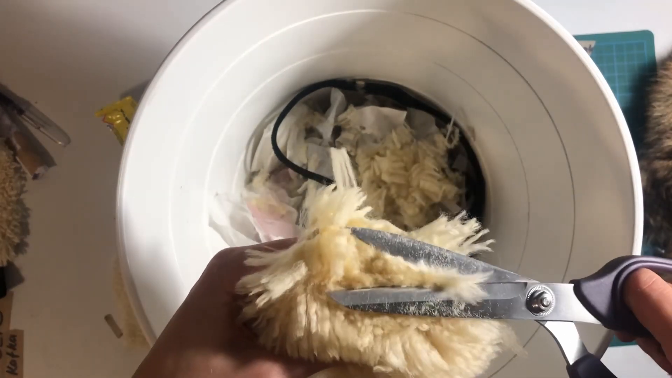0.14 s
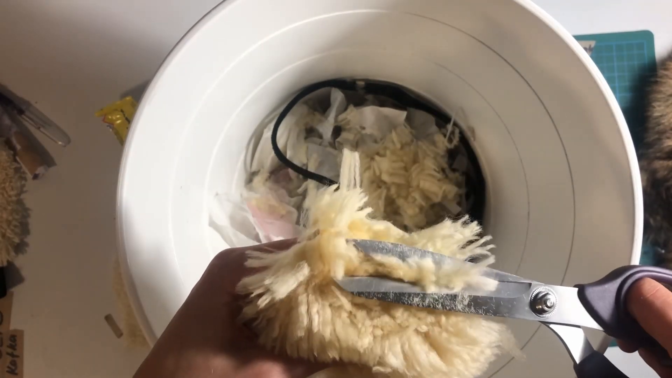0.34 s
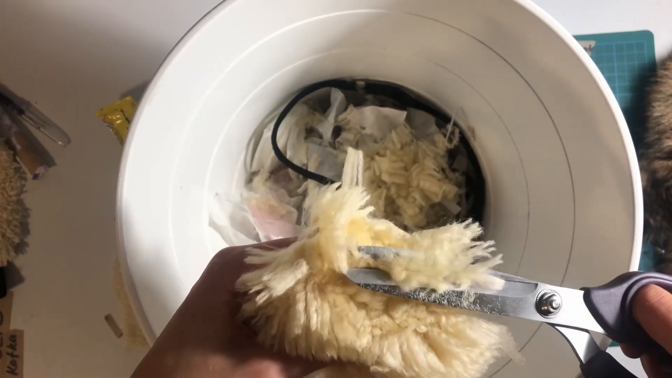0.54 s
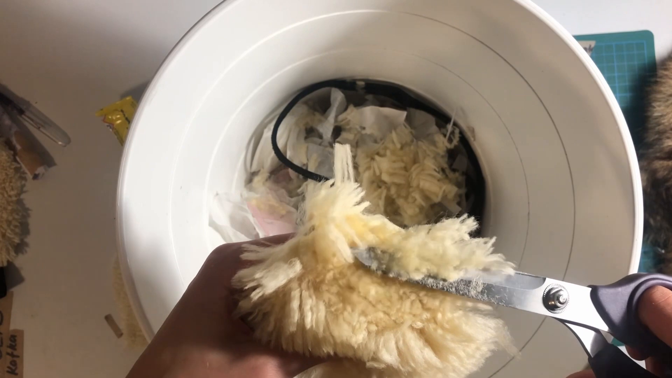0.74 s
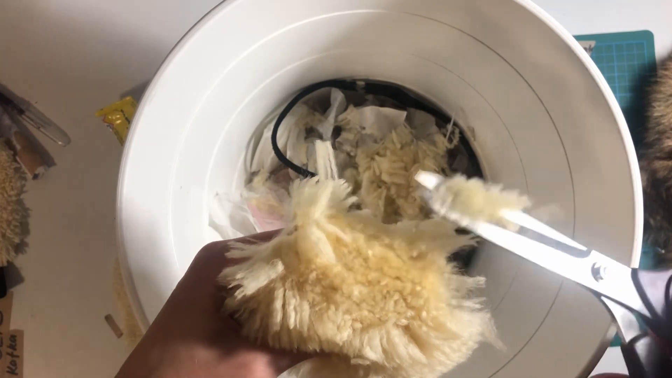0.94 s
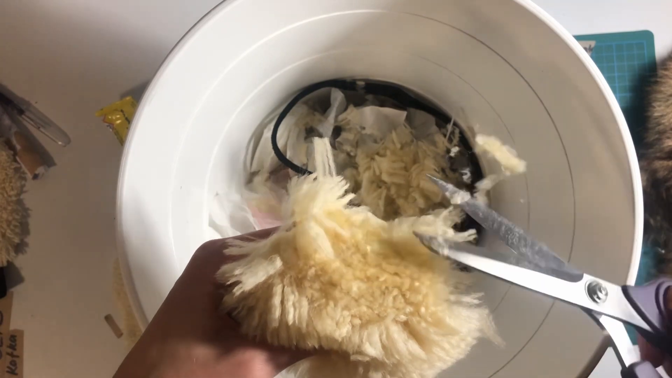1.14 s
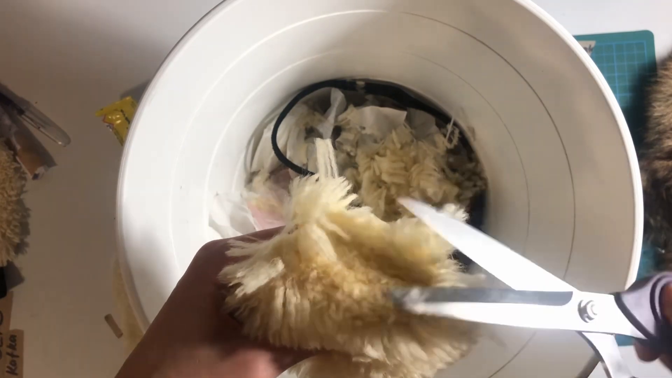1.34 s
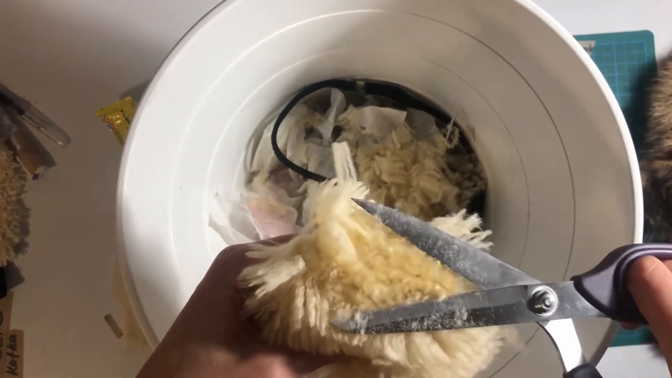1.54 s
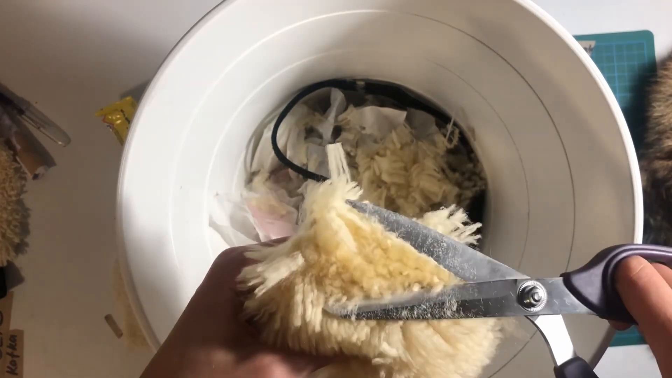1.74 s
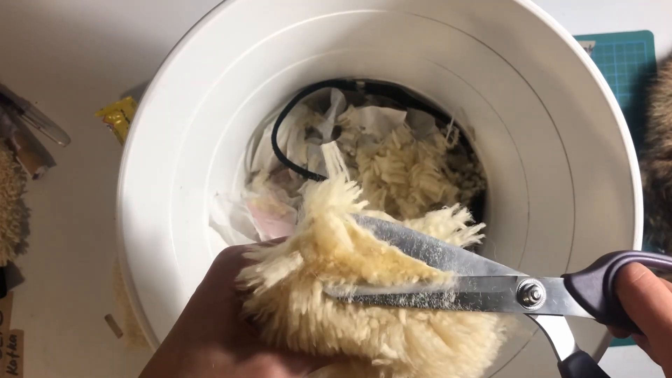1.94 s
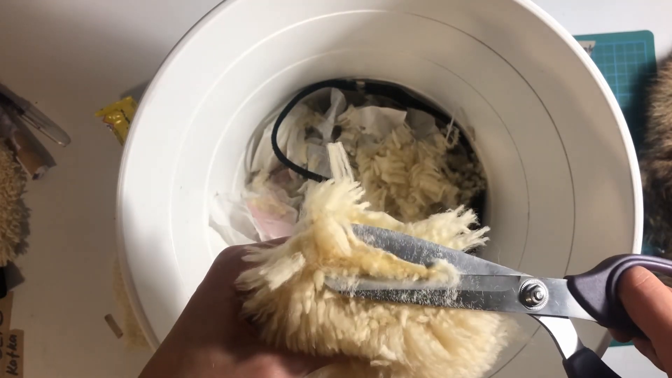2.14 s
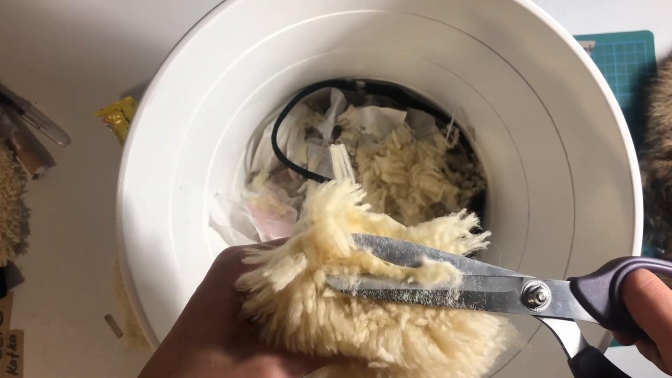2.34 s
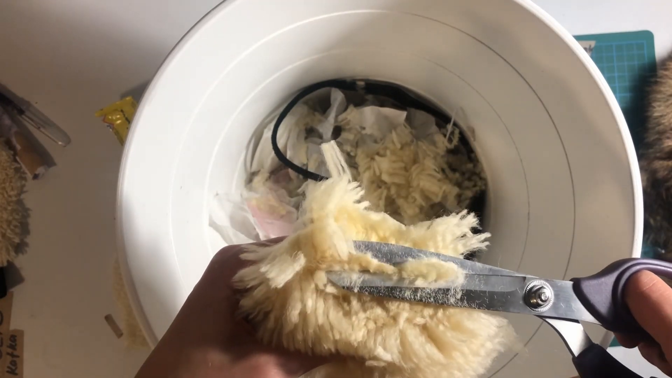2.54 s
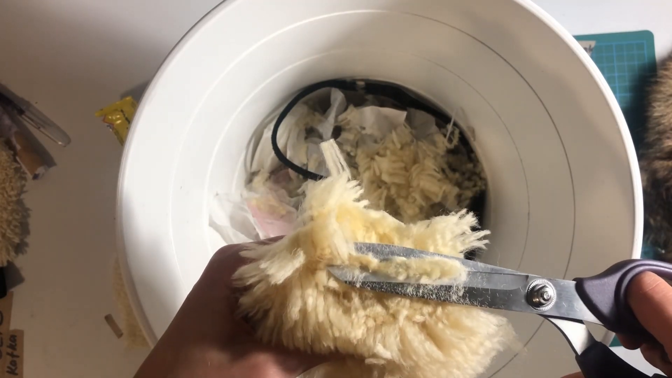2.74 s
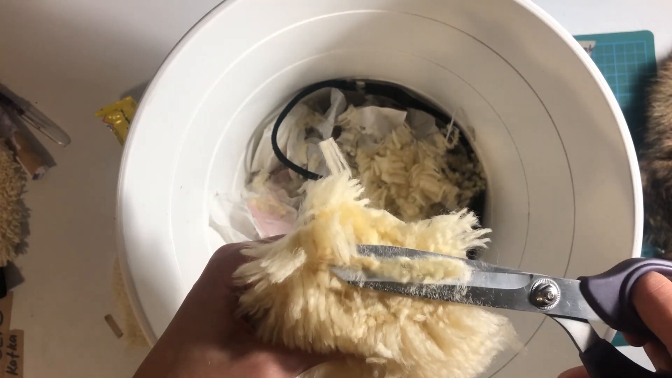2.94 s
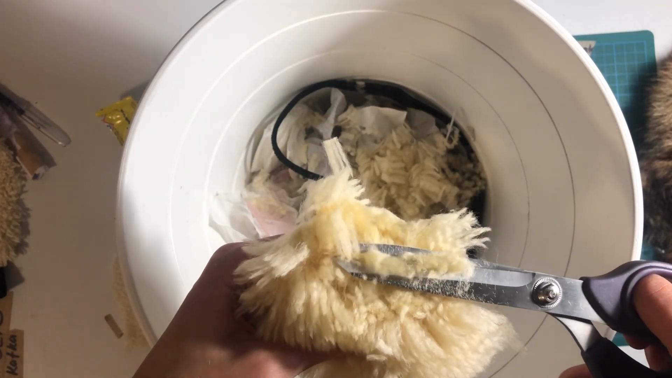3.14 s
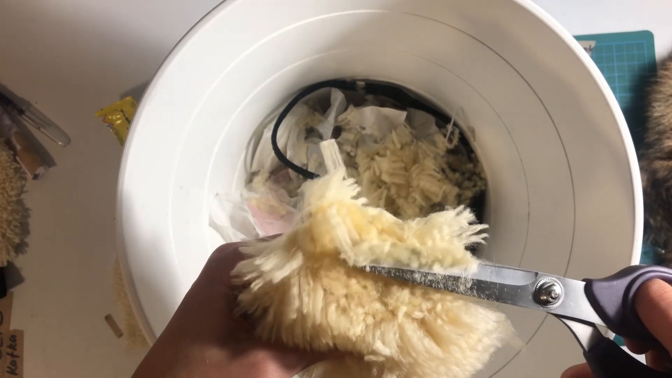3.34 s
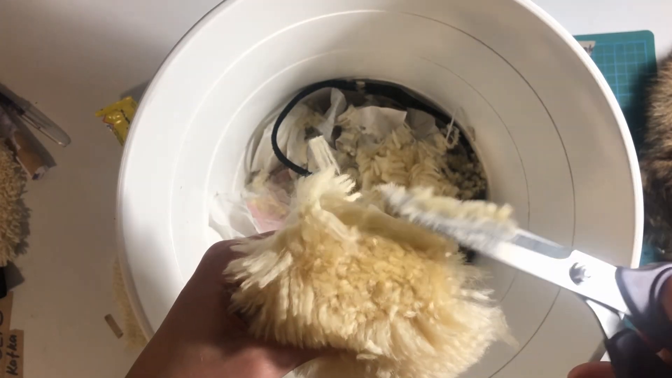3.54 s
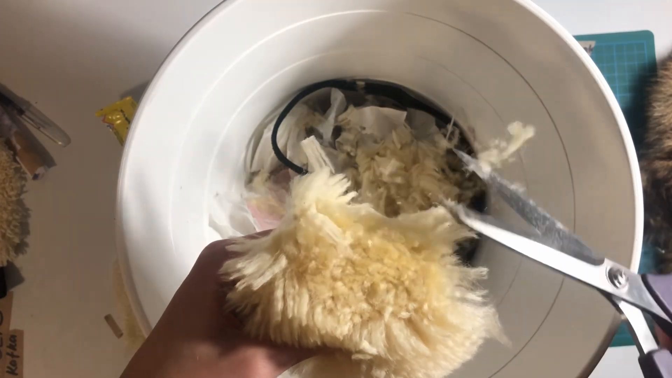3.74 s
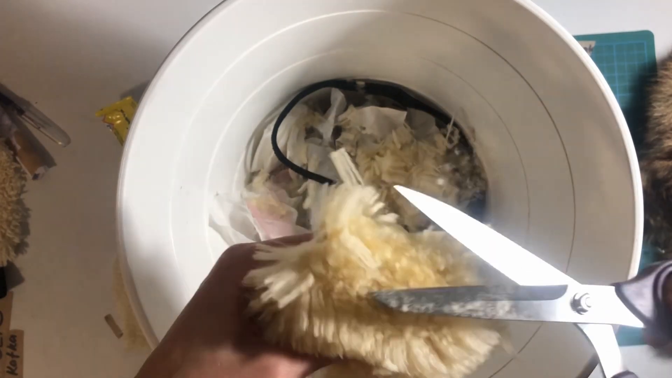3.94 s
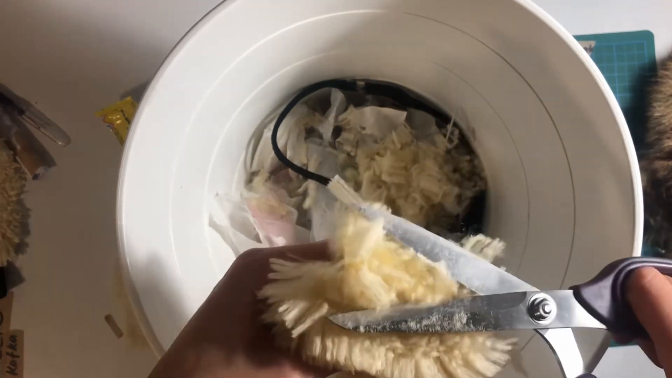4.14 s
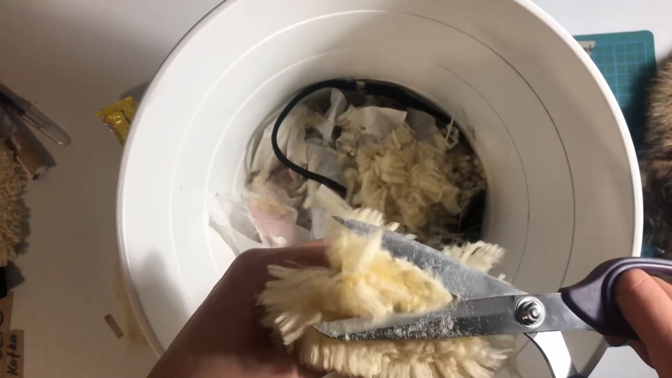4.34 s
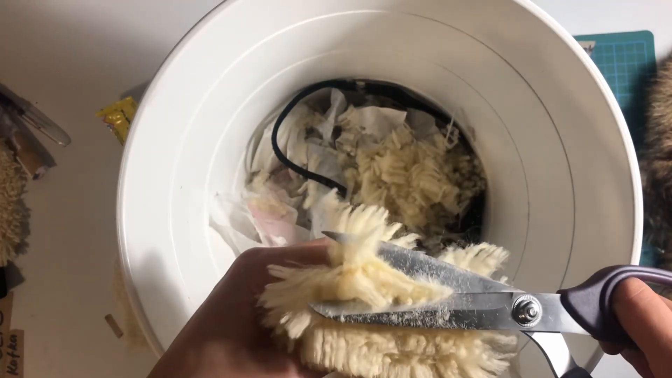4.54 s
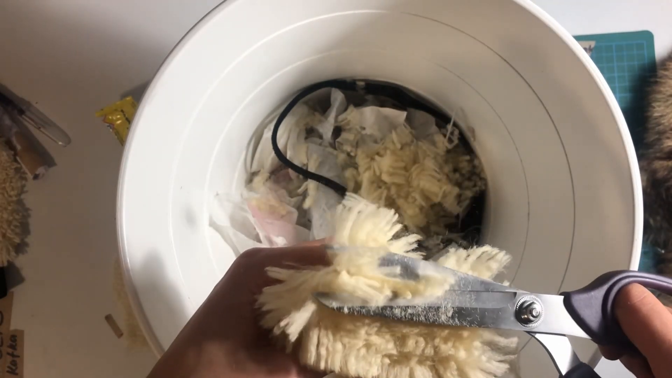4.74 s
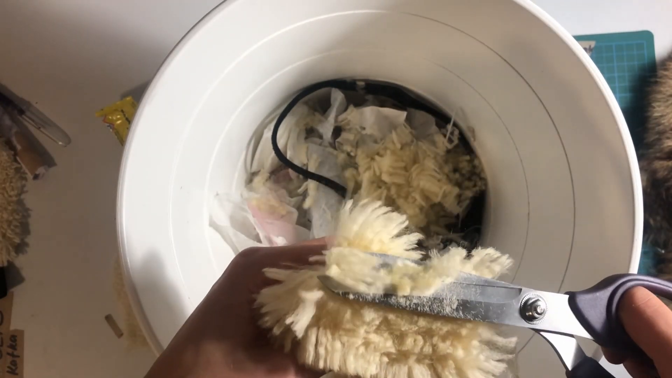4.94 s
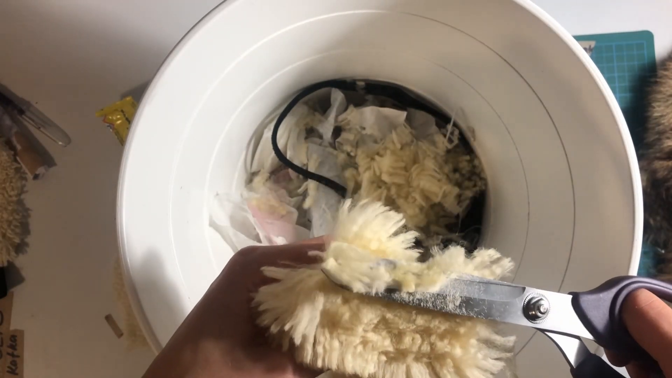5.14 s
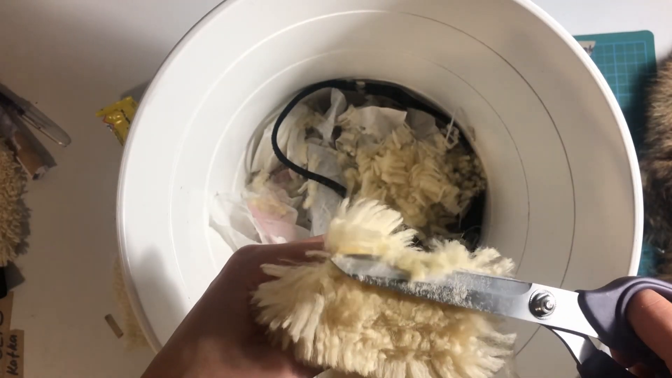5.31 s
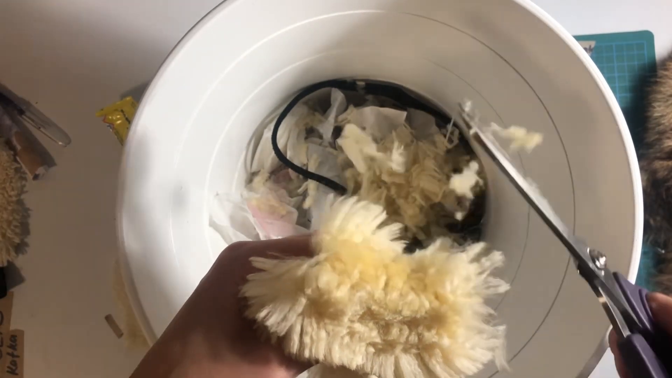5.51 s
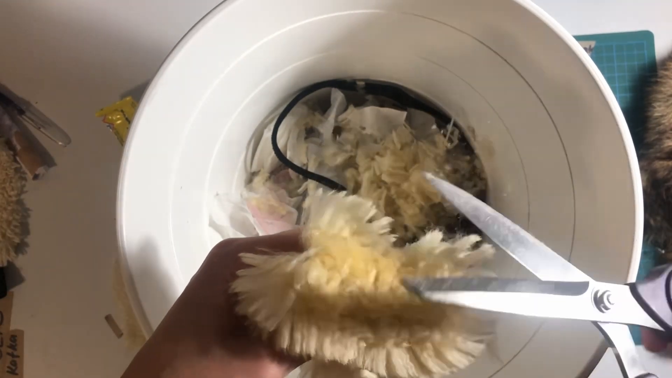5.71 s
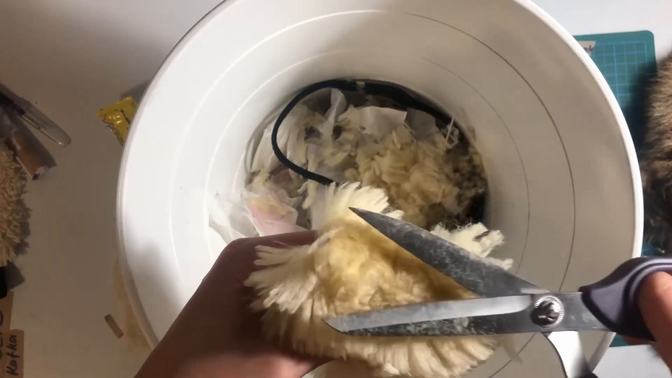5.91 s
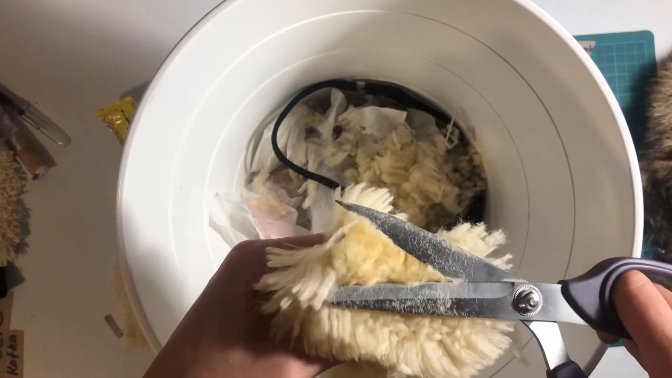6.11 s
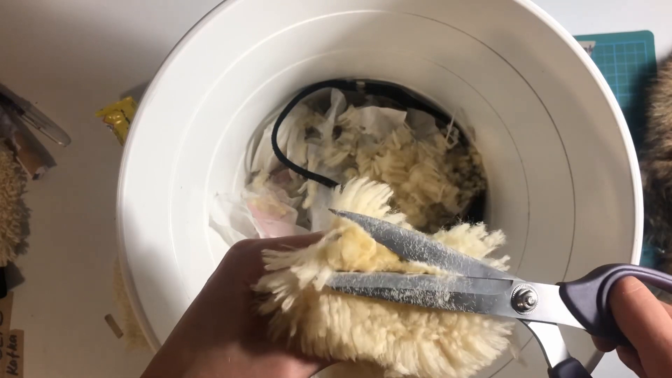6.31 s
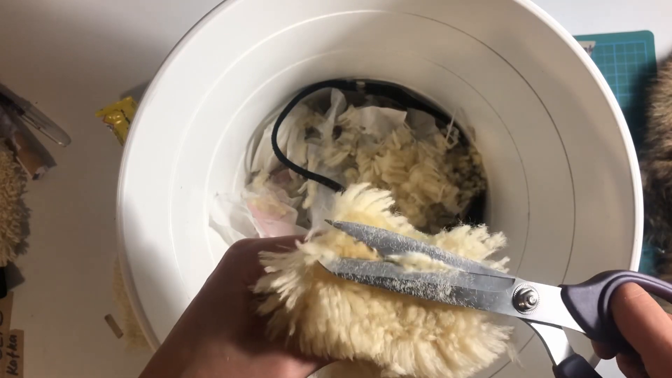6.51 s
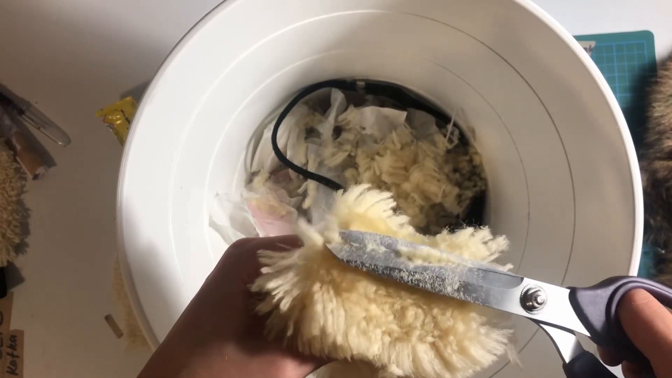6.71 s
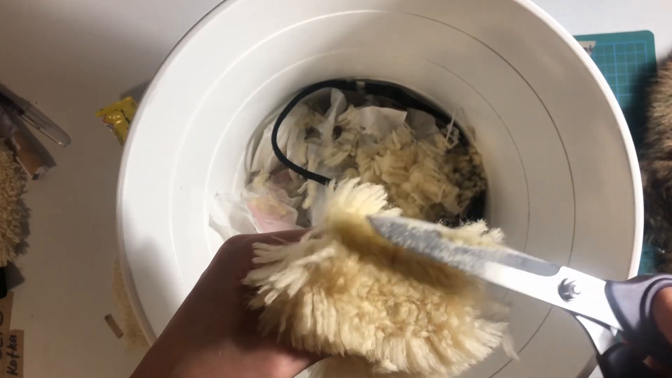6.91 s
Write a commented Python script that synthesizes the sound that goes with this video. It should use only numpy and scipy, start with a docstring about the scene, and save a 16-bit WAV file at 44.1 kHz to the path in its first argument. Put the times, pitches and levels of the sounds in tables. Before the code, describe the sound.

Large steel shears crunch slowly through thick fur fabric in four cuts, several ending in a hard metallic snap, close up in a small room.

```python
"""Large steel shears trim a piece of fur fabric over a bucket, close by in a small room.
Four slow cuts: noise-driven blade resonances crunch through the tufts bite by bite, under a thin rising
whistle and a treble fizz of fibres. Three times the shears slam shut, a burst of force on their resonances,
then part with a light scrape and swing open with a falling hiss and squeak.
Behind: dense reflections, soft handling bumps, a low rumble and steady room air, all shaped noise."""
import sys
import numpy as np
from scipy import signal
from scipy.fft import rfft, irfft, next_fast_len
from scipy.io import wavfile

SR = 44100
rng = np.random.default_rng(int(sys.argv[2]) if len(sys.argv) > 2 else 0)


def wav_record(signal):
    """Record a signal, one row per channel, as 16-bit PCM in the file named by sys.argv[1]."""
    frames = np.transpose(np.atleast_2d(signal))
    bounded = np.clip(frames, -1, 1)
    # unit amplitude maps onto the largest positive 16-bit level
    quanta = np.round(bounded * 32767).astype(np.int16)
    wavfile.write(sys.argv[1], SR, quanta)


N = 307377
T = np.arange(N) / SR


def from_db(db):
    """Decibels to gain."""
    return 10 ** (np.asarray(db) / 20)


def rms_one(x):
    """Scale to an rms of 1."""
    return x / np.sqrt(np.mean(x ** 2) + 1e-20)


def coloured(x, spectrum):
    """Give a steady signal a spectrum of (Hz, dB) points; rms 1."""
    points_hz, points_db = np.transpose(spectrum)
    size = next_fast_len(N)
    bins_hz = np.maximum(np.fft.rfftfreq(size, 1 / SR), 1)
    gain = from_db(np.interp(np.log(bins_hz), np.log(points_hz), points_db))
    return rms_one(irfft(rfft(x, size) * gain, size)[:N])


def drift(rate_hz):
    """Smooth chance, rms 1, with rate_hz random points a second joined by lines."""
    return rms_one(np.interp(T * rate_hz, np.arange(N // 10), rng.standard_normal(N // 10)))


def resonate(x, hz, width_hz):
    """Two-pole resonance that passes white noise at about unchanged power."""
    radius = np.exp(-np.pi * width_hz / SR)
    zeros = np.sqrt(1 - radius ** 2) / np.sqrt(2) * np.array([1, 0, -1])
    poles = [1, -2 * radius * np.cos(2 * np.pi * hz / SR), radius ** 2]
    return signal.lfilter(zeros, poles, x + 1e-18 * rng.standard_normal(N))


def soften(x, hz):
    """A gentle first-order low-pass."""
    return signal.sosfilt(signal.butter(1, hz, fs=SR, output="sos"), x)


def swells(rows, steepness=2.14, rise_share=0.4):
    """Each (middle s, dB, length s) row rises quickly and fades more slowly; overlaps add in power."""
    power = np.zeros(N)
    for s, db, length_s in rows:
        near = slice(max(int((s - 2 * length_s) * SR), 0), int((s + 2 * length_s) * SR))
        age = (T[near] - s) / length_s + .5 - rise_share
        side = np.where(age < 0, rise_share, 1 - rise_share)
        power[near] += from_db(db) ** 2 * np.exp(-np.abs(age / side) ** steepness)
    return np.sqrt(power)


def crackle(per_s, size_db, clump_db, clump_rate_hz, hiss):
    """Fibres snap at random, in clumps and in uneven sizes, over a smooth hiss; rms 1."""
    sizes = from_db(size_db * np.minimum(rng.exponential(1, N), 4)) * rng.choice([-1, 1], N)
    snaps = rms_one(sizes * (rng.random(N) < per_s / SR))
    clumps = from_db(clump_db * drift(clump_rate_hz))
    return rms_one((snaps + hiss * rng.standard_normal(N)) * clumps)


def whistle(hz, width_hz):
    """A narrow band of noise at a steady or moving pitch; rms 1."""
    phase = 2 * np.pi * np.cumsum(hz * np.ones(N)) / SR
    return rms_one(drift(width_hz) * np.cos(phase) + drift(width_hz) * np.sin(phase))


# Spectrum of the room air. Each row: frequency in Hz, relative level in dB per Hz.
AIR_SPECTRUM = [(15, -35), (25, -26), (64, 2), (123, -4.5), (235, -3), (981, -14.5), (1120, -15.5),
                (1510, -18), (10500, -22.5), (15800, -25.5)]


def room_air(level_db=-43):
    """Steady noise with the spectrum of the room air."""
    return from_db(level_db) * coloured(rng.standard_normal(N), AIR_SPECTRUM)


def rumble(hz=150, width_hz=110, level_db=-57, lumps_db=4):
    """An uneven low rumble under the room air: noise through one low resonance."""
    lumps = from_db(level_db + lumps_db * drift(12))
    return lumps * rms_one(resonate(rng.standard_normal(N), hz, width_hz))


def handling(hz=340, width_hz=220, level_db=-59, lumps_db=4):
    """The hands shift on the fur with soft, uneven bumps: resonant noise of drifting level."""
    lumps = from_db(level_db + lumps_db * drift(8))
    return lumps * rms_one(resonate(rng.standard_normal(N), hz, width_hz))


# Room tail. Each row: frequency in Hz, time to fade by 60 dB in seconds, relative level in dB.
ROOM_TAIL = [(1450, 0.28, 7), (6070, 0.23, 2.5), (9000, 0.24, 0), (15000, 0.35, -12)]


def room(direct, spill, wet_db=-15, first_s=.003, echo_s=0.0025, echo_db=-13):
    """Direct sound and bucket-rim echo; the spill returns as dense reflections, each band fading at its rate."""
    hz, age_s, noise = signal.stft(rng.standard_normal(SR // 2), SR, nperseg=128)
    points_hz, t60_s, points_db = np.transpose(ROOM_TAIL)
    start_db = np.interp(hz, points_hz, points_db)[:, None]
    fading = from_db(start_db - 60 * age_s / np.interp(hz, points_hz, t60_s)[:, None])
    tail = signal.istft(noise * fading * (age_s > first_s), SR)[1]
    reflections = signal.fftconvolve(spill, tail / np.linalg.norm(tail))[:N]
    echo = from_db(echo_db) * np.interp(T - echo_s, T, direct)
    return direct + echo + from_db(wet_db) * reflections


# Blades part and brush past each other. Each row: middle in seconds, level in dB, length in seconds.
SCRAPES = [(.966, -38, 0.037), (.982, -31, 0.02), (1.273, -40, 0.011), (3.61, -24.5, 0.012),
           (3.623, -33, 0.011), (5.503, -20.5, 0.0096), (5.512, -40, 0.035), (5.585, -42, 0.021),
           (5.714, -39.5, 0.013)]
# Scrape spectrum. Each row: frequency in Hz, relative level in dB.
SCRAPE_SPECTRUM = [(290, -25), (500, -9), (1060, 2), (1580, -11.5), (1990, -3.5), (2290, -4), (3010, -2),
                   (3530, -11), (6550, -4.5), (10400, -13), (12300, -3.5), (15500, -10.5)]
# Edges squeak as they swing open. Each row: middle in seconds, level in dB, length in seconds.
SQUEAKS = [(1.147, -46, 0.021), (3.769, -50, .026), (5.648, -45.5, 0.022)]


def opening(squeak_hz=8600, fall_hz_per_s=23000, rough_db=3, hiss_hz=12800, hiss_width_hz=1000,
            hiss_db=-3.0, lead_s=0.079, hiss_s=0.035):
    """The blades scrape apart; the heel gives a falling hiss, then a broken whistle falls with it."""
    snaps = crackle(per_s=4600, size_db=6.0, clump_db=2.5, clump_rate_hz=480, hiss=0.14)
    scrape = swells(SCRAPES) * coloured(snaps, SCRAPE_SPECTRUM)
    times_s = np.array(SQUEAKS)[:, 0]
    nearest = np.searchsorted((times_s[1:] + times_s[:-1]) / 2, T)
    since_s = T - times_s[nearest]
    squeak = whistle(squeak_hz - fall_hz_per_s * since_s, width_hz=820)
    squeak = swells(SQUEAKS) * squeak * from_db(rough_db * drift(200))
    hiss = whistle(hiss_hz - fall_hz_per_s * (since_s + lead_s), hiss_width_hz)
    heel = swells([(s - lead_s, db + hiss_db, hiss_s) for s, db, _ in SQUEAKS]) * hiss
    return scrape + heel + squeak


# Shears slam shut. Each row: time in seconds, relative strength in dB, chatter decay in seconds.
SLAMS = [(0.6518, 10.5, 0.0031), (3.3231, 16.5, 0.0025), (5.2254, 9, 0.00045)]
# Resonances of the whole shears and handles. Each row: frequency in Hz, width in Hz, level in dB.
FRAME = [(285, 140, -7), (422, 77, -4), (740, 65, -11), (897, 126, -1.5), (1290, 380, 0), (2050, 340, -2),
         (2470, 75, -2.5), (2700, 240, 3.5), (3190, 120, -9.5), (4390, 2300, 9.5), (6140, 1800, 12.5),
         (8900, 4200, 6), (13700, 480, 18)]


def slams(spread_s=.006, chatter=0.048, level_db=-7.5):
    """The handles knock and chatter; in steel, low bending waves arrive after high ones."""
    age_s, force = T[:SR // 20], np.zeros(N)
    for s, strength_db, decay_s in SLAMS:
        blow = chatter * rng.standard_normal(len(age_s)) * np.exp(-age_s / decay_s)
        blow[0] += 1
        force[round(s * SR):][:len(age_s)] += from_db(strength_db + level_db) * blow
    knock = sum(from_db(db) * resonate(force, hz, width_hz) for hz, width_hz, db in FRAME)
    # delay is spread_s at the second resonance and falls with the root of frequency
    size = next_fast_len(N)
    turns = 2 * spread_s * np.sqrt(FRAME[1][0] * np.fft.rfftfreq(size, 1 / SR))
    return irfft(rfft(knock, size) * np.exp(-2j * np.pi * turns), size)[:N]


def slam_spill(level_db=9, low_hz=300, soft_hz=5500):
    """Each slam's clap in all directions: broad, thin in the bass, without single resonances."""
    clap = np.zeros(N)
    for s, strength_db, _ in SLAMS:
        clap[round(s * SR)] = from_db(strength_db + level_db)
    thin = signal.butter(2, low_hz, "high", fs=SR, output="sos")
    return signal.sosfilt(thin, soften(clap + 1e-18, soft_hz))


def screech(hz=13950, width_hz=700, level_db=-20, length_s=.0028):
    """The tips screech for an instant at each slam: a short band of noise."""
    bursts = swells([(s, strength_db + level_db, length_s) for s, strength_db, _ in SLAMS])
    return bursts * whistle(hz, width_hz)


# Closings of the shears. Each row: start in seconds, slide up to the pile in seconds, stay in the pile
# in seconds, whole length in seconds, speed of the last press in blade lengths per second, final travel 0-1.
CUTS = [(0.048, 0.2, 0.21, 0.55, 1.98, 0.83), (1.848, 0.4, 0.22, 1.45, 0.31, 0.8),
        (4.453, 0.32, 0.15, 0.83, 2, 0.79), (6.13, 0.34, 0.1, 0.66, 9.3, 0.77)]
# Travel of the crossing point (pivot 0, tip 1): meeting the pile, as it yields, after the slip.
PILE_AT, YIELD_AT, SLIP_TO = 0.32, 0.53, 0.59
SLIP_S = 0.047


def crossing_point():
    """Edges slide to the pile, work through it at each cut's own pace, slip as it yields, press tipwards."""
    travel = np.zeros(N)
    for start_s, slide_s, pile_s, _, speed, reach in CUTS:
        turns_s = start_s + np.cumsum([0, slide_s, pile_s, SLIP_S])
        stages = np.interp(T, turns_s, [0, PILE_AT, YIELD_AT, SLIP_TO])
        press = speed * np.maximum(T - turns_s[-1], 0)
        travel = np.where(T >= start_s, np.minimum(stages + press, reach), travel)
    return travel


# The hand pushes the edges on and they rub. Each row: start in seconds, length in seconds, level in dB.
PUSHES = [(0.029, 0.22, -29), (0.309, 0.054, -24), (0.486, 0.11, -30.5), (1.866, 0.36, -30.5),
          (2.381, 0.037, -26.5), (2.507, 0.13, -30.5), (2.716, 0.086, -36), (3.11, 0.15, -32.5),
          (4.461, 0.23, -29), (4.905, 0.085, -29.5), (5.14, 0.1, -28), (6.122, 0.43, -31),
          (6.594, 0.1, -27)]


def rub_strength(travel, attack_s=0.013, release_s=0.013, lean_db=-43.5, contact_at=0.11):
    """Pushes rise, hold and die away over the hand's light lean; contact grows near the pivot."""
    closing = sum((T > start_s) & (T < start_s + length_s) for start_s, _, _, length_s, _, _ in CUTS)
    push = np.zeros(N)
    for start_s, length_s, db in PUSHES:
        rise = np.clip((T - start_s) / attack_s, 0, 1)
        fade = np.exp(-np.clip((T - start_s - length_s) / release_s, 0, 20))
        push += from_db(db) * rise * fade
    return np.hypot(from_db(lean_db) * closing, push) * np.minimum(travel / contact_at, 1)


# Tufts giving way between the edges, and the sharp bursts as the edges meet at each slam.
# Each row: middle in seconds, level in dB, length in seconds.
BITES = [(.208, -20.5, 0.016), (.227, -21, 0.011), (.255, -21.5, 0.0054), (.297, -18.5, 0.011),
         (.333, -23, 0.015), (.414, -16.5, 0.011), (.516, -24, 0.027), (.559, -19.5, 0.022),
         (.602, -12, 0.0086), (.62, -7.5, 0.0091), (.645, -6.5, 0.0094), (.652, -2, 0.0031),
         (2.348, -13, 0.0097), (2.371, -24, 0.016), (2.395, -26, 0.0063), (2.516, -20, 0.016),
         (2.586, -19, 0.013), (2.615, -24, 0.037), (2.738, -30.5, 0.017), (2.856, -33.5, 0.0065),
         (2.991, -16, 0.015), (3.008, -17.5, 0.0077), (3.095, -14, 0.014), (3.153, -22, 0.007),
         (3.216, -20, 0.0041), (3.2335, -16, 0.011), (3.26, -8, 0.0045), (3.3226, 1.5, 0.0023),
         (4.639, -24, 0.03), (4.678, -26.5, .018), (4.709, -23, 0.0049), (4.738, -29, 0.018),
         (4.773, -15.5, 0.011), (4.8, -19.5, 0.02), (4.841, -24.5, 0.014), (4.895, -20.5, 0.019),
         (4.949, -19, 0.015), (4.978, -28, 0.018), (5.018, -16.5, 0.011), (5.0435, -16, 0.013),
         (5.074, -14.5, 0.01), (5.11, -15.5, 0.0073), (5.144, -20, 0.0075), (5.162, -19, 0.0053),
         (5.206, -13.5, 0.017), (5.226, -11.5, 0.0094), (6.4, -25.5, 0.047), (6.454, -23, 0.012),
         (6.504, -23, 0.028), (6.554, -21, 0.012), (6.657, -28, 0.0068), (6.686, -21.5, 0.011),
         (6.806, -18, 0.011), (6.842, -30.5, 0.0075), (6.862, -25.5, 0.0086)]


def bite_strength(rub, travel, count=170, tuft_db=3, spread_db=6, tuft_s=0.0039):
    """Listed bites, and small random ones, relative to the rubbing, that grow as the edges near the pile."""
    small = [(when * N / SR, tuft_db + spread_db * (2 * size - 1), tuft_s)
             for when, size in rng.random((count, 2))]
    in_pile = np.minimum(travel / PILE_AT, 1) ** 4
    return np.hypot(swells(BITES), in_pile * rub * swells(small))


def edge_whistle(travel, rub, bite, pivot_hz=7850, rise_hz=8900, level_db=-8, scatter_hz=1900, rough_db=1.5):
    """The blade's whistle rises as the edges close and grows ragged until the fur damps it."""
    undamped = np.interp(travel, [0, .24, .39], [.55, 1.15, 0])
    hz = pivot_hz + travel * (rise_hz + scatter_hz * drift(1800))
    drive = np.hypot(rub, bite) * from_db(level_db + rough_db * drift(220))
    return drive * undamped * whistle(hz, width_hz=400)


# Travel, 0-1. In order: pivot, heel, middle, front and tip of the blades.
PLACES = [.12, .4, .62, .71, .87]


def fizz(travel, rub, bite, above_hz=10500, level_db=-3, hardness=1.114, rub_db=-5,
         place_db=(-6, 1.5, -5, -7, 2)):
    """Parting fibres crackle high in the treble, most under a hard bite, strongest at heel and tip."""
    pressure = np.hypot(rub * from_db(rub_db), bite) ** hardness
    snaps = crackle(per_s=7300, size_db=-0.5, clump_db=6.5, clump_rate_hz=480, hiss=0.051)
    bright = signal.sosfilt(signal.butter(2, above_hz, "high", fs=SR, output="sos"), snaps)
    return from_db(level_db + np.interp(travel, PLACES, place_db)) * pressure * rms_one(bright)


# Blade resonances. Each row: frequency in Hz, width in Hz, then relative level in dB when excited
# at pivot, heel, middle, front and tip.
BLADE = [(894, 310, -8, -10, -8, -11, -16), (2182, 364, -6.5, -3.5, 0.5, -2, -3.5),
         (2430, 1140, -8, -6.5, 1.5, 0, -3.5), (3025, 367, -11.5, -8, 0.5, 1.5, -1.5),
         (3760, 400, -8, -14, -1, 0.5, -23), (4350, 570, -3.5, -7, 1, 1, -4),
         (5050, 1120, -0.5, -9.5, -3.5, 0, -7), (6630, 640, -1.5, -6.5, -9, 4, 3),
         (7275, 330, -4.5, -8.5, -27, -13.5, 4.5), (7590, 960, -7.5, -7, -18.5, -13, 1),
         (10160, 520, -9, 1, -30, -33, -11), (11070, 1200, -11, -4, -30, -21, 0),
         (12220, 480, -8, 4.5, -10, -29, -19), (13900, 470, -14, -6.5, -17, -12, -7),
         (13600, 1400, -11, -22, -30, -15, 9), (14200, 3700, -26, -1.5, -5, -20, -30)]
# Steel singing on after each bite. Each row: frequency in Hz, width in Hz, relative level in dB.
STEEL = [(2603, 55, -17.5), (6720, 41, -26), (7450, 110, -9.5)]


def cutting(travel, rub, bite, soft_hz=11000, shift_db=1.5, shift_rate_hz=90, sing_db=-7):
    """Rubbing and snapping fibres shake the blades; the crossing point sets which resonances answer."""
    rubbing = rub * crackle(per_s=6000, size_db=3.5, clump_db=1.83, clump_rate_hz=120, hiss=1.5)
    biting = bite * crackle(per_s=10000, size_db=4.5, clump_db=2.9, clump_rate_hz=890, hiss=1.0)
    force = soften(rubbing, soft_hz) + biting
    # the strength of each blade resonance wavers at random throughout
    gains = [np.interp(travel, PLACES, from_db(row[2:])) * from_db(shift_db * drift(shift_rate_hz))
             for row in BLADE]
    force = force / np.sqrt(sum(gain ** 2 for gain in gains))
    blades = sum((-1) ** k * resonate(force * gains[k], *row[:2]) for k, row in enumerate(BLADE))
    # singing grows towards the tips
    singing = sum(from_db(db + sing_db) * resonate(biting * travel, hz, width_hz)
                  for hz, width_hz, db in STEEL)
    return blades + singing


def scene():
    """The shears and hands in the room, over its steady air."""
    travel = crossing_point()
    rub = rub_strength(travel)
    bite = bite_strength(rub, travel)
    edges = cutting(travel, rub, bite) + fizz(travel, rub, bite) + edge_whistle(travel, rub, bite)
    edges = edges + screech() + opening()
    shears = room(edges + slams(), edges + slam_spill())
    return (shears + handling() + rumble() + room_air())[None]


def record(dry, cutoff_hz=16000):
    """The loudest blows overload the input, which rounds their peaks; a steep low-pass cuts the top."""
    overloaded = dry / (1 + dry ** 6) ** (1 / 6)
    return signal.sosfilt(signal.ellip(12, .1, 70, cutoff_hz, fs=SR, output="sos"), overloaded)


dry = scene()
out = record(dry)
wav_record(out)
```